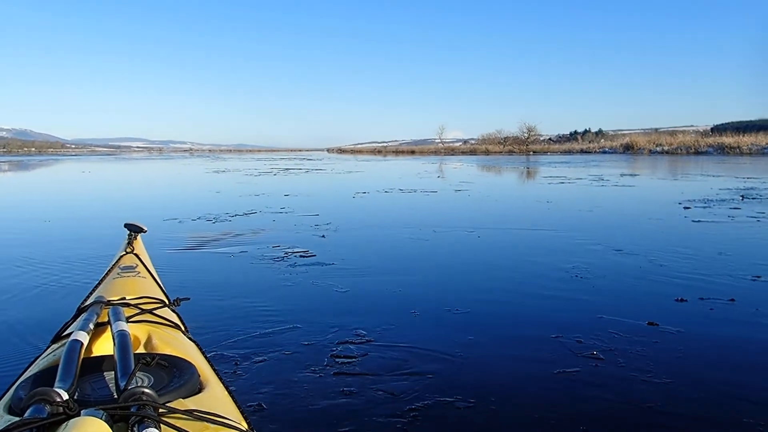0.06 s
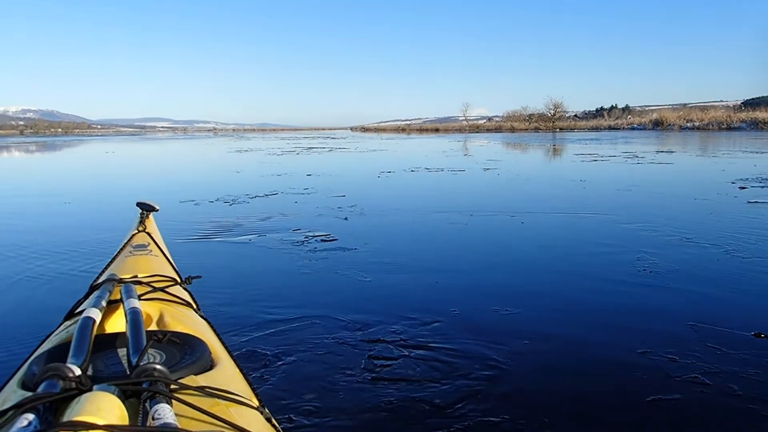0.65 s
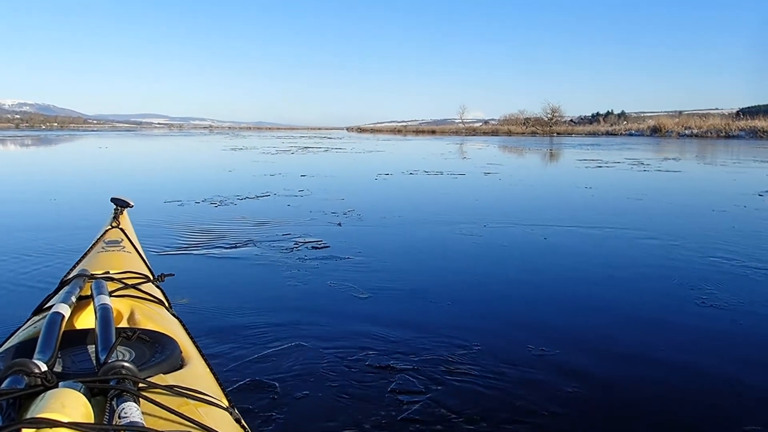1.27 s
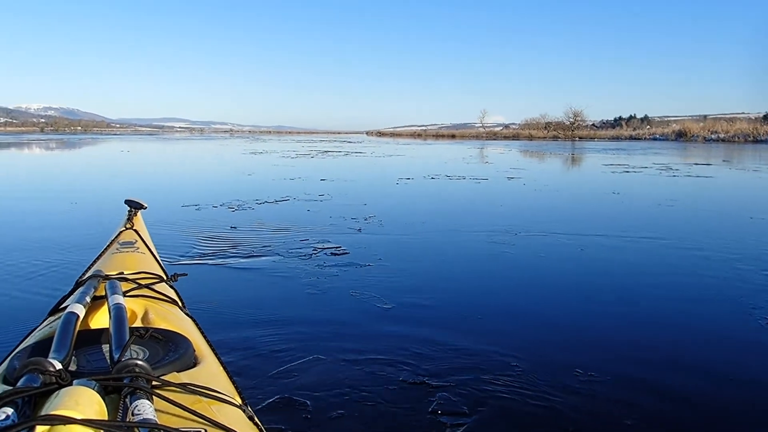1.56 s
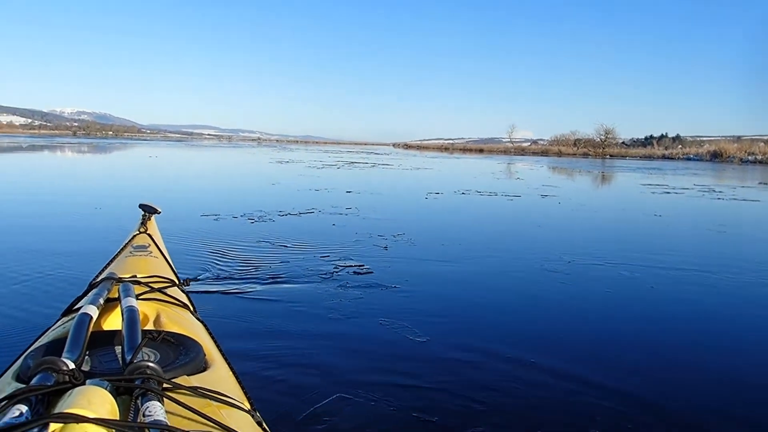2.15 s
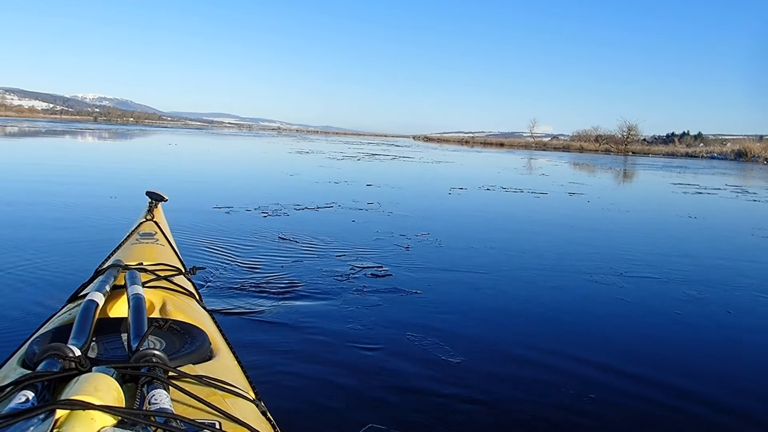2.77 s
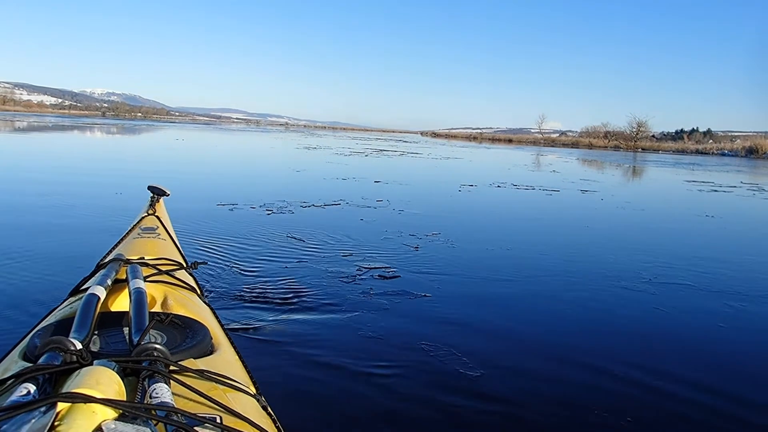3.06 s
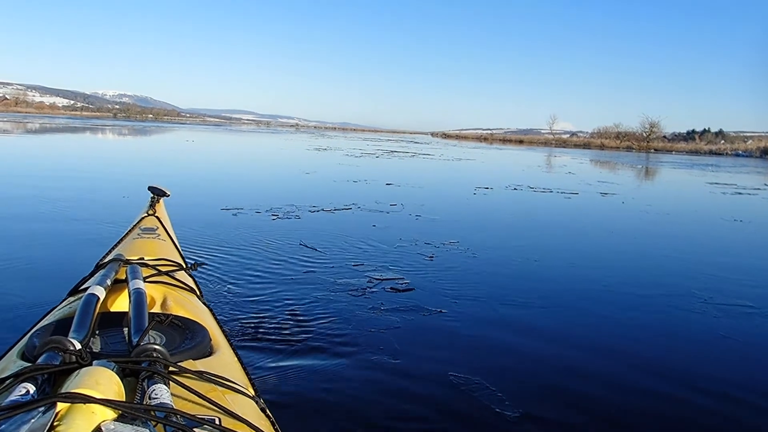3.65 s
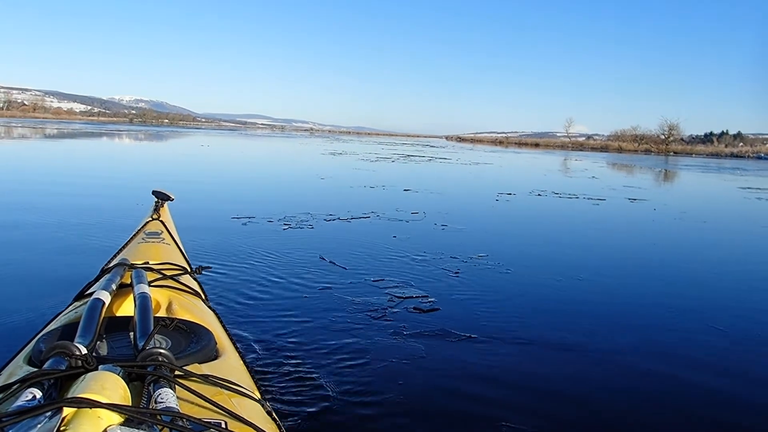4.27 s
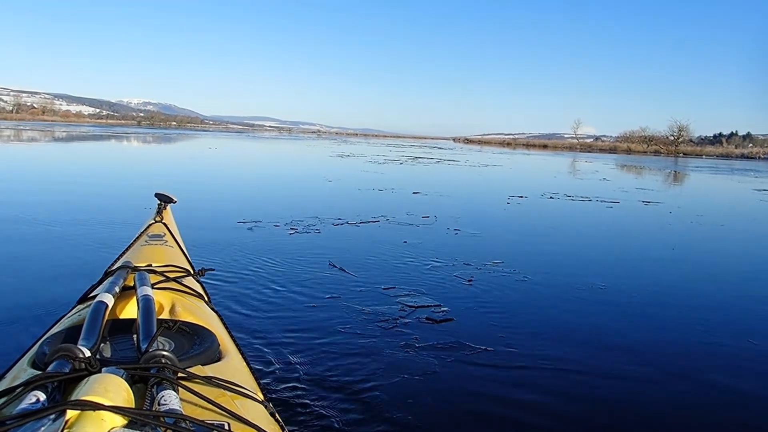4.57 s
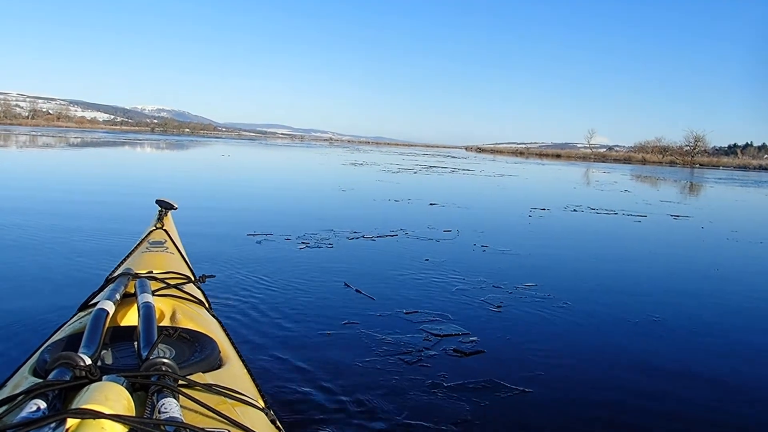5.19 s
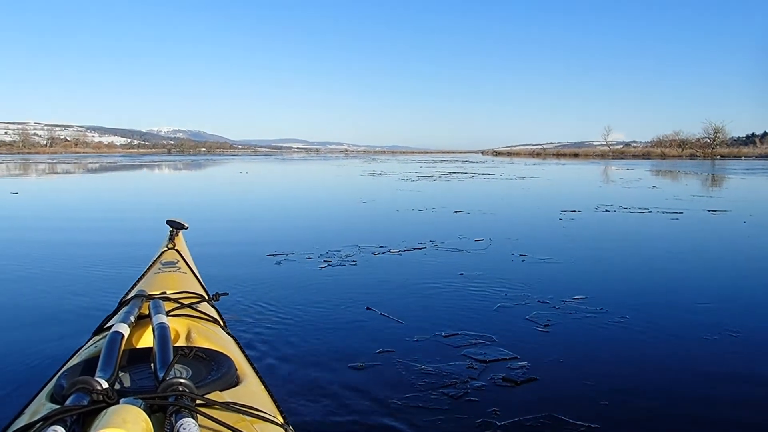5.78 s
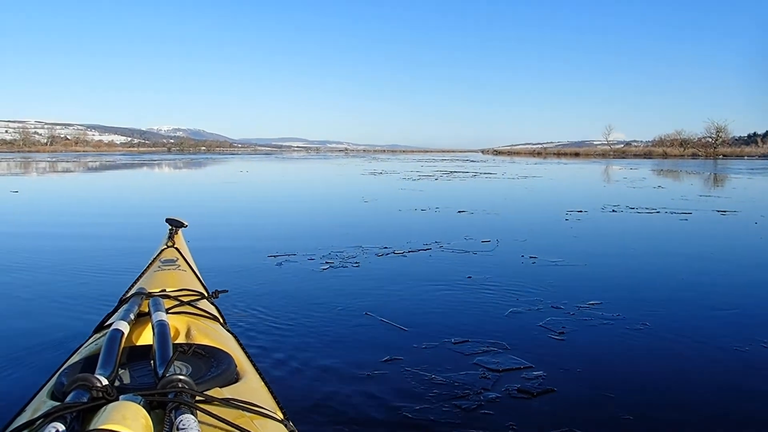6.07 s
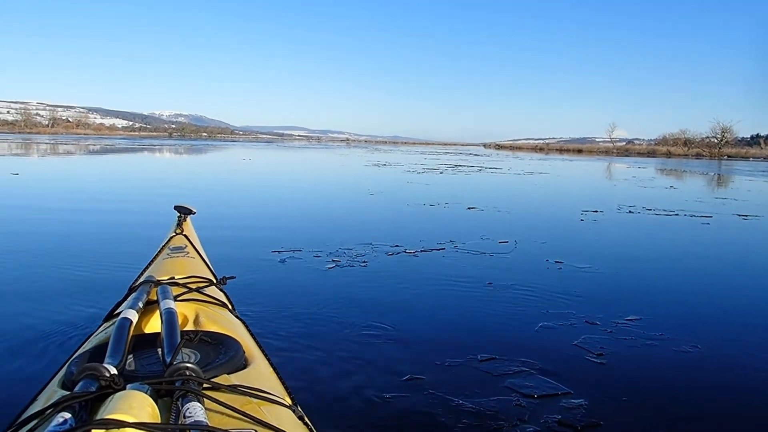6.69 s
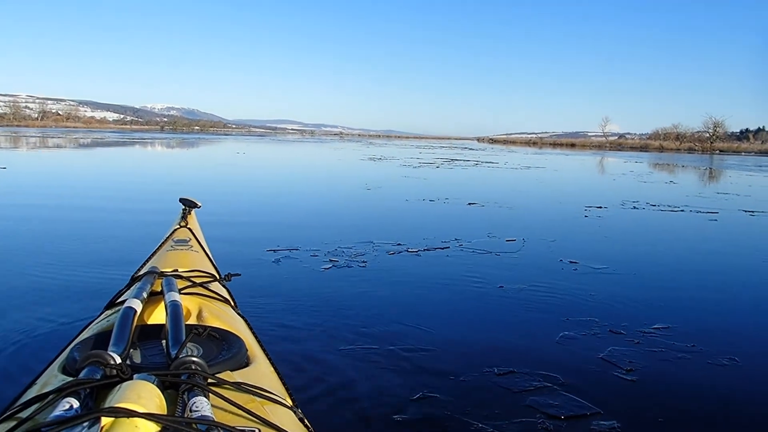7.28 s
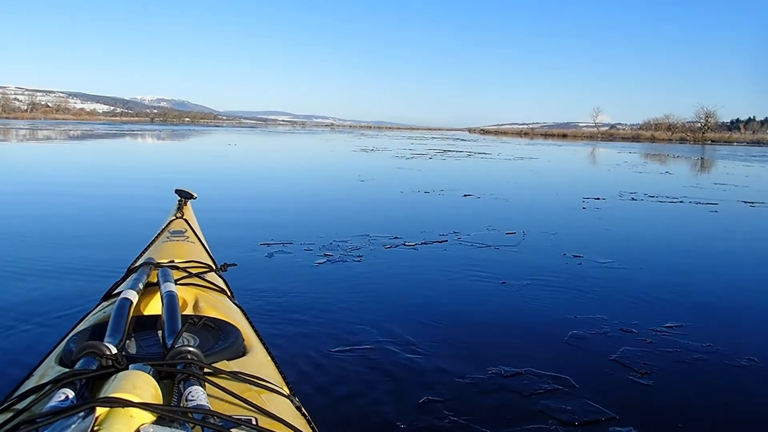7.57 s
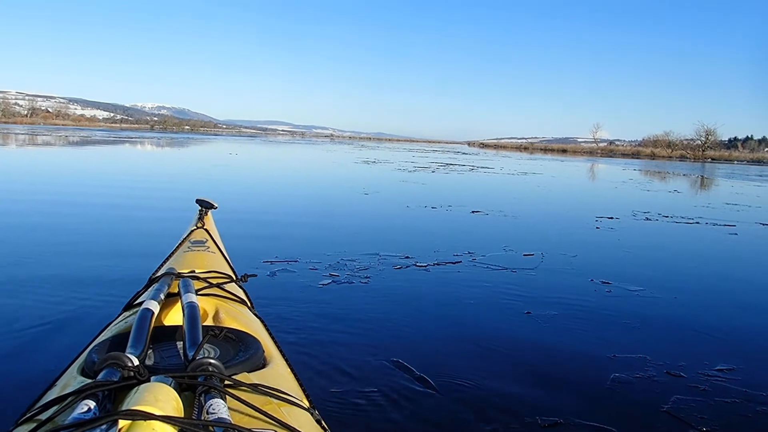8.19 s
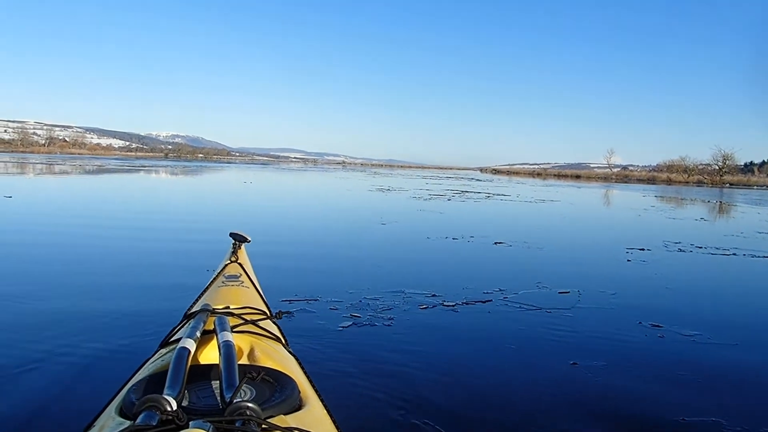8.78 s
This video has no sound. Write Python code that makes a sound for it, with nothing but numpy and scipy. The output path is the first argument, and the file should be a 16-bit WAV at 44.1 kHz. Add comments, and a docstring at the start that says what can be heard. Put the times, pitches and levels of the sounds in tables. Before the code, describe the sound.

Thin ice crackles and knocks against a kayak's hollow hull, thickening into a loud grind that gives way to soft water and drips.

```python
"""On a still river, a kayak noses through thin ice, heard from its own deck.
Each crack is a swarm of tiny fractures that fizzes (high) in the ice and knocks (middle) and booms
(low) in the hollow hull. Loose plates clack and thud against the boat. The crunching thickens into
a steady grinding, then the boat slides out into open water, where a few drops fall."""
import sys
import numpy as np
from scipy import signal
from scipy.fft import rfft, irfft
from scipy.io import wavfile
from scipy.ndimage import uniform_filter1d

SR = 44100
rng = np.random.default_rng(int(sys.argv[2]) if len(sys.argv) > 2 else 0)


def bounce(signal):
    """Save signal as a 16-bit WAV file at the path given by the first command-line argument."""
    frames = np.transpose(np.atleast_2d(signal))
    limited = np.clip(frames, -1, 1)
    pcm = np.round(limited * 32767).astype(np.int16)
    wavfile.write(sys.argv[1], SR, pcm)


N = 398663
TIME = np.arange(N) / SR
BOOM_TOP_HZ, KNOCK_TOP_HZ, FIZZ_FROM_HZ = 573, 2700, 3160
GRIND_START_S, GRIND_ATTACK_S, STALL_S = 5.735, 0.0015, 0.041


def from_db(db):
    """Turns decibels into a number to multiply by."""
    return 10 ** (np.asarray(db) / 20)


def rms_one(x):
    """Scales a sound so that its average power is 1."""
    return x / np.sqrt(np.mean(x ** 2) + 1e-20)


def unit_energy(x):
    """Scales a sound so that its squares add up to 1."""
    return x / np.sqrt(np.sum(x ** 2) + 1e-20)


def decay(t, t60):
    """Fades by 60 dB in t60 seconds, the fade time."""
    return np.exp(-np.log(1000) * t / t60)


def ramp(start_s, length_s):
    """Rises from 0 to 1."""
    return np.clip((TIME - start_s) / length_s, 0, 1)


def drift(rate):
    """A random curve that takes a new turn rate times a second."""
    knots = rng.standard_normal(8192)
    return np.interp(TIME * rate, np.arange(len(knots)), knots)


def add(track, s, sound):
    """Mixes a sound into a track at s seconds."""
    start = max(round(s * SR), 0)
    part = track[..., start:start + sound.shape[-1]]
    part += sound[..., :part.shape[-1]]


def butter(x, hz, kind, order=4):
    """Keeps the lows, the highs or a band of a sound."""
    sections = signal.butter(order, np.clip(hz, 10, .45 * SR), kind, fs=SR, output="sos")
    return signal.sosfilt(sections, x)


def colour(x, points, size=8192):
    """Shapes the tone along a curve of (Hz, dB) points."""
    hz, db = np.transpose(points)
    bins_hz = np.arange(size // 2 + 1) * SR / size
    log_gain = np.log(from_db(np.interp(np.log(bins_hz + 1), np.log(hz + 1), db)))
    cepstrum = irfft(log_gain)[:size // 2]
    cepstrum[1:] *= 2   # the filter rings only after a click, never before
    response = irfft(np.exp(rfft(cepstrum, size)))[:size // 2]
    shaped = signal.oaconvolve(np.atleast_2d(x), response[None], axes=1)
    return shaped[:, :x.shape[-1]].reshape(x.shape)


def river(level_db, ripple_db):
    """Water washes softly along the hull, with a wide, steady hiss on top."""
    # Each row: frequency in Hz, gain in dB.
    tone = [(30, -13), (95, -1), (270, 3), (384, -1.5), (584, -1), (670, -9), (800, -1), (1100, -3.5),
            (2000, -14.5), (2500, -28.5), (3600, -28.5), (5400, -14), (7700, -17), (9100, -11.5),
            (10400, -27), (16000, -28)]
    # Each row: frequency in Hz, stereo width in dB.
    width = [(60, -4), (240, -13), (950, -16), (3770, -13.5), (15000, 6)]
    # The water's swell. Each row: time in seconds, level change in dB.
    wash = [(0, -3), (0.8, -3.5), (1.1, -1), (2.2, 0.5), (2.9, -3.5), (7.2, -1), (8.65, -0.5), (8.8, 2),
            (8.92, -2)]
    mid, side = rng.standard_normal((2, N))
    lapping = butter(mid, KNOCK_TOP_HZ, "low", order=1) * (from_db(ripple_db * drift(25)) - 1)
    pair = mid + lapping + colour(side, width) * [[1], [-1]]
    return from_db(level_db + np.interp(TIME, *np.transpose(wash))) * rms_one(colour(pair, tone))


def fractures(per_s, spread_db, size):
    """Tiny breaks in the ice: random clicks, many small and a few large."""
    born = rng.random(size) < per_s / SR
    signs = rng.choice([-1, 1], size)
    return born * signs * from_db(spread_db * np.minimum(rng.exponential(1, size), 4))


def registers_db(s, level_db, bright_db):
    """Fizz, knock and boom levels of ice breaking at s seconds."""
    # How much the hull booms. Each row: time in seconds, boom over knock in dB.
    boominess = [(0, 2.5), (2.5, 2), (3.3, 5), (5.9, 2), (6.3, -2.5), (6.55, -6.5), (6.9, -6), (7.3, -3)]
    return np.array([level_db + bright_db, level_db, level_db + np.interp(s, *np.transpose(boominess))])


def crumbling(level_db, bright_db, per_s, spread_db, clump_db, clumps_per_s, trim_db):
    """Ice sticks and slips, breaking in clumps; gives the fizz, knock and boom forces."""
    # The ice holds for a moment. Each row: time in seconds, dip of the fizz in dB.
    stalls = [(.11, -26), (.5, -33), (.73, -29), (3.69, -13), (4.065, -12), (4.71, -6.5), (5.71, -11.5),
              (5.899, -7.5), (6.1, -5.5), (6.51, -4), (6.78, -4.5), (6.979, -12)]
    clicks = fractures(per_s, spread_db, N) * from_db(clump_db * drift(clumps_per_s))
    power = np.abs(uniform_filter1d(clicks ** 2, round(.07 * SR)))
    clicks = clicks / np.sqrt(power + 1e-9)
    stalled_db = sum(db * np.exp(-((TIME - s) / STALL_S) ** 2) for s, db in stalls)
    hush_db = np.outer([1, 0.68, 0.8], stalled_db)   # knock and boom dip less
    return clicks * from_db(registers_db(TIME, level_db, bright_db) + hush_db + np.array(trim_db)[:, None])


def crunching():
    """Small ice crumbles at the bow until the big sheet takes over."""
    # Each row: time in seconds, relative level in dB, fizz over knock in dB.
    crunch = [(0.0, -60, -17), (0.25, -40, -9), (0.8, -46, -11), (1.099, -38, -3), (1.6, -40, -9.5),
              (1.95, -51.5, -1), (2.3, -54, 6.5), (2.55, -39.5, -9.5), (2.95, -53, -10), (3.3, -31.5, -7.5),
              (3.65, -33.5, -17.5), (4.2, -29, -12), (4.55, -33.5, -10.5), (5.0, -27.5, -8.5),
              (5.3, -31, -9), (5.73, -34, -13)]
    # Thicker ice is lumpier. Each row: time in seconds, spread of the clumps in dB.
    lumpiness = [(1.8, 4.5), (3.3, 6)]
    s, level_db, bright_db = np.transpose(crunch)
    clump_db = np.interp(TIME, *np.transpose(lumpiness))
    forces = crumbling(np.interp(TIME, s, level_db), np.interp(TIME, s, bright_db), per_s=2800,
                       spread_db=2.5, clump_db=clump_db, clumps_per_s=80, trim_db=[-.3, -.3, -.3])
    return forces * (1 - ramp(GRIND_START_S, GRIND_ATTACK_S))


def stray_bits(per_s, level_db):
    """Drifting crumbs of ice tick on the hull, too light to make it boom."""
    return np.outer([1, 1, 0], from_db(level_db) * fractures(per_s, 1, N))


def cracks(trim_db, click_share, swell_t60, boom_linger_s):
    """Each crack swells in quickly to a sharp click, then its crackle dies as the hull booms on."""
    # Each row: start in seconds, relative level in dB, brightness in dB, fade time in seconds.
    breaks = [(0.02, -3.5, -11.5, 0.22), (0.154, -3, -5, 0.35), (0.354, -2, -7, 0.21),
              (0.539, -2.5, -7.5, 0.12), (0.59, -6, -2.5, 0.28), (0.644, -6.5, -5, 0.034),
              (0.783, -13, -7.5, 0.045), (0.874, -7, -1.5, 0.075), (0.933, -4, -5.5, 0.04),
              (0.955, -14.5, 3.5, 0.022), (1.012, -5.5, -5, 0.037), (1.302, -18, 8, 0.021),
              (2.041, -8, -7, 0.04), (2.087, -1.5, -10.5, 0.068), (2.152, -14.5, 0.5, 0.0086),
              (2.333, -2.5, -5, 0.047), (2.424, 3.5, -1, 0.085), (2.699, -5, -5, 0.02),
              (2.753, -7, -5.5, 0.013), (2.873, -3, -4, 0.12), (2.972, -4.5, -8, 0.032),
              (3.019, 1.5, -5.5, 0.084), (3.052, 2.5, -4.5, 0.09), (3.114, -2, -8, 0.045),
              (3.14, -8, -3, 0.036), (3.251, -6, -3, 0.055), (3.338, 2, -10.5, 0.1),
              (3.392, -5, 1.5, 0.029), (3.479, -1, -2, 0.042), (3.532, 3, -6.5, 0.036),
              (3.579, -0.5, -3, 0.021), (3.631, -8, -2.5, 0.011), (3.653, -1, -3.5, 0.039),
              (3.722, -4, -1, 0.13), (3.82, -4, -1.5, 0.056), (3.878, -6.5, 0.5, 0.046),
              (3.958, 1.5, -9, 0.068), (4.089, 2, -11.5, 0.12), (4.134, 0.5, -4, 0.23), (4.173, 1, -6, 0.2),
              (4.271, 2, -7.5, 0.14), (4.295, -0.5, -11, 0.033), (4.35, -5, -1, 0.02),
              (4.437, -0.5, -8.5, 0.034), (4.522, 2, -8, 0.025), (4.627, -5, 0.5, 0.092),
              (4.772, -4, -5.5, 0.019), (4.8, -5, -3, 0.015), (4.881, -4, -7, 0.04), (4.935, -6, 4, 0.17),
              (4.966, -2, 0.5, 0.06), (5.016, -5, 2.5, 0.03), (5.061, -2.5, -0.5, 0.014),
              (5.096, 5.5, -1, 0.2), (5.195, 2.5, -1.5, 0.05), (5.324, -2, -17, 0.03),
              (5.368, -4.5, 4.5, 0.09), (5.429, -1.5, -1, 0.051), (5.522, -1, -6, 0.037),
              (5.557, 0.5, -12.5, 0.019), (5.66, -2.5, -12.5, 0.11), (5.736, -5, 5, 0.09),
              (6.46, 0.5, 5, 0.1), (6.96, 2.5, -3, 0.009), (6.995, -3.5, -4, 0.028), (7.012, -3, -1, 0.016),
              (7.033, 0.5, 2, 0.074), (7.09, -3, 0.5, 0.028), (7.241, -18, -4, 0.042)]
    forces, lead = np.zeros((3, N)), 512
    t = TIME[:20 * lead] - lead / SR
    for s, db, bright_db, t60 in breaks:
        clicks = fractures(per_s=3000, spread_db=4.5, size=len(t))
        gains = from_db(registers_db(s, db, bright_db) + trim_db)
        for force, gain, dying_t60 in zip(forces, gains, (t60, t60, t60 + boom_linger_s)):
            swarm = unit_energy(clicks * decay(np.abs(t), np.where(t < 0, swell_t60, dying_t60)))
            swarm[lead] += click_share
            add(force, s + .001 + t[0], gain * unit_energy(swarm))
    return forces


def plates(force, low_hz, high_hz, ring_t60, direct_db, hold_s, count, spread_hz=None):
    """Plates of ice take turns to ring, each at its own pitch; spread_hz scatters small shards."""
    # A shard's size sets its tinkle. Each row: time in seconds, typical pitch in Hz.
    shard_pitch = [(1.2, 6970), (2.4, 5560), (3.4, 5830), (3.58, 7220), (4.3, 5420), (4.97, 6300),
                   (5.08, 8500), (5.2, 5500), (5.37, 7870), (5.8, 7130), (6.0, 5440), (6.72, 6110),
                   (6.85, 5390)]
    at = np.flatnonzero(force)
    turn = (at / SR / hold_s).astype(int)
    chosen = rng.integers(0, count, N)[turn]
    if spread_hz is not None:
        pitch = np.interp(at / SR, *np.transpose(shard_pitch)) + spread_hz * rng.standard_normal(N)[turn]
        chosen = np.round((pitch - low_hz) / (high_hz - low_hz) * (count - 1)) % count
    r = decay(1 / SR, ring_t60)   # share of the ring left after one sample
    gain = np.sqrt((1 - r) * (high_hz - low_hz) / SR)
    out = from_db(direct_db) * force
    for k, hz in enumerate(np.linspace(low_hz, high_hz, count)):
        clicks = np.full(N, 1e-18)
        clicks[at[chosen == k]] = force[at[chosen == k]]
        out += signal.lfilter([gain, 0, -gain], [1, -2 * r * np.cos(2 * np.pi * hz / SR), r * r], clicks)
    return out / np.sqrt(1 + from_db(direct_db) ** 2)


def loose_ice(fizz, knock, boom):
    """Small shards tinkle briefly, larger floes clack, whole sheets boom."""
    return [plates(fizz, 3740, 10760, ring_t60=0.0031, direct_db=-3.5, hold_s=0.0018, count=23,
                   spread_hz=1800),
            plates(knock, 501, 2292, ring_t60=0.077, direct_db=1.5, hold_s=.007, count=28),
            plates(boom, 62.4, 481.6, ring_t60=0.092, direct_db=-2, hold_s=.002, count=12)]


def hull_response(tone, modes, modes_db, scatter_db, scatter_t60):
    """The boat answers one fracture with a click, ringing notes (modes) and a bright tail."""
    # Each row: frequency in Hz, stereo width in dB.
    width = [(60, -28), (200, -10), (600, -18), (1500, -36), (3000, -18), (5000, 1.5), (9000, 8),
             (13000, 10.5)]
    t = TIME[:8192]
    tail, side = (unit_energy(noise * decay(t, scatter_t60)) for noise in rng.standard_normal((2, len(t))))
    mid = (t == 0) + from_db(scatter_db) * butter(tail, 2760, "high", order=2)
    for hz, db, t60 in modes:
        dying = decay(t, t60)
        mid += from_db(db + modes_db) * 2 * np.cos(2 * np.pi * hz * t) * dying / dying.sum()
    return colour(np.array([mid, colour(side, width)]), tone)


def through_hull(forces, response, width_db, pans_db):
    """Fizz, knock and boom pass through the boat; slow bending waves bring the low ones later."""
    # Each row: band edges in Hz, filter kind, delay in seconds.
    registers = [(FIZZ_FROM_HZ, "high", 0), ([BOOM_TOP_HZ, KNOCK_TOP_HZ], "band", .001),
                 (BOOM_TOP_HZ, "low", .004)]
    out, apart = np.zeros((2, N)), np.array([[1], [-1]])
    for force, pan_db, (hz, kind, lag_s) in zip(forces, pans_db, registers):
        path = butter(response, hz, kind)
        wandering = np.array([force, force * drift(250)])   # each fracture has its own direction
        mid, side = signal.oaconvolve(wandering, path / np.sqrt(np.sum(path[0] ** 2)), axes=1)
        add(out, lag_s, (mid + from_db(width_db) * side * apart) * from_db(pan_db / 2 * apart))
    return out


def bumps(t60, top_hz):
    """Loose plates clack against the bow; the wet contact softens their highest notes."""
    # Each row: start in seconds, relative level in dB, lowest note in Hz.
    hits = [(0.028, -32, 1063), (0.538, -28.5, 940), (2.088, -30, 870), (2.336, -24.5, 383),
            (2.433, -16, 375), (6.328, -16, 1067), (6.563, -16.5, 1080), (6.653, -12.5, 1027),
            (6.927, -16, 1090), (7.036, -15, 952)]
    # A plate's notes. Each row: multiple of the lowest note, relative level in dB.
    notes = [(1, -1.5), (1.27, -7.5), (1.59, -8), (2, -7), (2.33, -12)]
    out, t = np.zeros(N), TIME[:SR // 4]
    for s, db, hz in hits:
        for k, (multiple, note_db) in enumerate(notes):
            ring = np.sin(2 * np.pi * hz * multiple * t) * decay(t, t60)
            add(out, s, (-1) ** k * from_db(db + note_db) * ring)
    return butter(out, top_hz, "low", order=3)


def snaps(level_db, ring_t60, spray_db):
    """Sharp snaps and ticks close by: a very short ring and a bright spray."""
    # Each row: start in seconds, relative level in dB, pitch in Hz, low cut in Hz.
    ticks = [(1.0145, -15.5, 6800, 4060), (1.7863, -13, 4800, 1400), (3.535, -19, 6600, 4000),
             (5.2128, -7.5, 6960, 4800), (5.8202, -4.5, 6900, 4800), (5.931, -11.5, 7400, 4800)]
    out, t = np.zeros((2, N)), TIME[:1024]
    for s, db, hz, low_hz in ticks:
        burst = rng.standard_normal((2, len(t))) * decay(t, 0.0068)
        spray = colour(burst, [(1500, -59), (5000, -4), (9000, 24), (14000, -18)])
        spray *= from_db([[2.5], [-2.5]])   # louder on the left
        snap = np.sin(2 * np.pi * hz * t) * decay(t, ring_t60) + from_db(spray_db) * spray
        add(out, s, from_db(db + level_db) * butter(snap, low_hz, "high", order=3))
    return out


def thuds(level_db, t60, attack_t60, rise_per_s):
    """A soft blow on the hull rings a floe or a pocket of water, whose pitch lifts as it closes."""
    # Each row: start in seconds, relative level in dB, pitch in Hz.
    blows = [(1.512, -24.5, 181), (1.72, -23, 129), (3.334, -11.5, 203), (3.341, -15, 137),
             (3.403, -12, 182), (3.59, -15, 195), (3.783, -17, 180), (3.952, -11.5, 119), (4.011, -18, 188),
             (4.13, -14, 321), (4.17, -12.5, 331), (4.29, -17, 380), (4.44, -13, 201), (4.523, -7, 191),
             (4.804, -9, 190), (4.85, -8, 177), (4.883, -7, 173), (4.989, -6, 190), (5.068, -14, 168),
             (5.224, -11, 175), (5.433, -14, 483), (5.552, -14, 273), (5.824, -19, 333),
             (5.872, -13.5, 313), (5.878, -9, 186), (5.944, -10, 135), (5.955, -15.5, 302),
             (6.339, -12.5, 193)]
    out, t = np.zeros(N), TIME[:SR // 4]
    for s, db, hz in blows:
        pocket = np.sin(2 * np.pi * hz * t * (1 + rise_per_s * (t - t60 / 2)))
        add(out, s, from_db(db + level_db) * pocket * decay(t, t60) * (1 - decay(t, attack_t60)))
    return out


def heaves(low_hz, high_hz, t60):
    """The hull flexes with a deep, soft thump as it rides over a sheet."""
    # Each row: start in seconds, relative level in dB.
    flexes = [(3.041, -35), (3.558, -29.5), (5.22, -28.5), (5.519, -29), (5.818, -31)]
    out, t = np.zeros(N), TIME[:SR // 2]
    for s, db in flexes:
        thump = rms_one(butter(rng.standard_normal(len(t)), [low_hz, high_hz], "band", order=3))
        add(out, s, from_db(db) * thump * decay(t, t60))
    return butter(out, 54, "high")


def grinding(stop_s, release_s):
    """A whole sheet catches and shears along the boat, then lets go, and the pieces settle."""
    held_s = np.clip(TIME, GRIND_START_S, stop_s) - GRIND_START_S
    after_s = np.maximum(TIME - stop_s - release_s, 0)
    level_db = -28 + 1.5 * held_s - 1.5 * ramp(stop_s, release_s) - 50.5 * after_s   # swell, dip, fade
    bright_db = -0.5 + decay(held_s, t60=0.37) - 19 * after_s   # bright first bite, dull ending
    forces = crumbling(level_db, bright_db, per_s=11000, spread_db=2.0, clump_db=3.5,
                       clumps_per_s=260, trim_db=[1.2, .5, .3])
    return forces * ramp(GRIND_START_S - GRIND_ATTACK_S, GRIND_ATTACK_S)


def sheet_edge(fizz, knock, boom):
    """Along the shearing edge, glassy shards jingle and plates take turns to ring."""
    return [plates(fizz, 3530, 10500, ring_t60=0.026, direct_db=-0.5, hold_s=0.0008, count=71,
                   spread_hz=1600),
            plates(knock, 696, 2033, ring_t60=0.077, direct_db=1.5, hold_s=.001, count=24), boom]


def drops(ring_t60, rise_per_s, splash_db):
    """Each drop makes a small splash and traps a bubble whose pitch rises a little as it dies."""
    # Each row: start in seconds, starting pitch in Hz, relative level in dB.
    drips = [(7.243, 920, -29.5), (7.46, 5640, -42), (7.588, 1400, -36), (7.623, 3430, -49),
             (8.015, 804, -26), (8.016, 5370, -35.5), (8.017, 580, -30), (8.33, 2700, -50),
             (8.867, 1070, -34.5), (9.03, 1360, -35)]
    out, t = np.zeros(N), TIME[:4096]
    envelope = decay(t, ring_t60) * (1 - decay(t, 0.0022))
    for s, hz, db in drips:
        bubble = np.sin(2 * np.pi * hz * t * (1 + rise_per_s * t))
        splash = rms_one(butter(rng.standard_normal(len(t)), [hz / 1.23, hz * 1.18], "band", order=2))
        add(out, s, from_db(db) * (bubble + from_db(splash_db) * splash) * envelope)
    return out


def scene():
    """Cracks, crunch and grinding sound through the hull, over the river."""
    # Notes of the hull and the ice sheet. Each row: pitch in Hz, relative level in dB, fade in seconds.
    hull_modes = [(78, -4, 0.089), (186, -1, 0.19), (471.4, 4.5, 0.051), (827, 2.5, 0.024),
                  (1120, -5, 0.18), (1483, -11, 0.12), (6250, -11, 0.024)]
    sheet_modes = [(580, -6, 0.066), (762, 5.5, 0.083), (1100, 3, 0.084), (1493, 3.5, 0.048),
                   (1860, -9, 0.045), (4730, -5, 0.0028), (5700, 2, 0.015), (6900, -9, 0.016)]
    # Tone of the struck and the rubbed hull. Each row: frequency in Hz, gain in dB.
    struck_tone = [(24, -66), (66, -10), (189, 1.5), (245, -1), (449, -6), (684, -23.5), (866, -23),
                   (1430, -21), (2120, -31.5), (2540, -44), (5590, -31), (8740, -34.5), (10500, -45),
                   (16000, -57.5)]
    rubbed_tone = [(24, -57), (64, -3.5), (200, 1), (584, -1.5), (666, -13), (920, -3.5), (1040, 0.5),
                   (1220, -1.5), (2010, -8), (2200, -10.5), (2480, -19), (3300, -18.5), (4300, -15.5),
                   (5740, -11.5), (9460, -15.5), (10400, -23.5), (16000, -35)]
    breaking = cracks(trim_db=[1.4, 1.9, 0.5], click_share=0.16, swell_t60=0.014, boom_linger_s=0.087)
    on_sheet = TIME > GRIND_START_S - STALL_S
    struck = hull_response(struck_tone, hull_modes, modes_db=0, scatter_db=-9, scatter_t60=.014)
    # steady rubbing keeps the hull singing, and the sheet with it
    rubbed = hull_response(rubbed_tone, hull_modes + sheet_modes, modes_db=-0.5, scatter_db=-13,
                           scatter_t60=0.031)
    loose = loose_ice(*(breaking * ~on_sheet + crunching() + stray_bits(per_s=9.1, level_db=-36)))
    ice = through_hull(loose, struck, width_db=-8, pans_db=[.3, -.4, -.5])
    edge = sheet_edge(*(breaking * on_sheet + grinding(stop_s=6.815, release_s=0.077)))
    sheet = through_hull(edge, rubbed, width_db=-5, pans_db=[2.8, -.2, -.4])
    water = river(level_db=-41.94, ripple_db=2.5) + drops(ring_t60=0.035, rise_per_s=1.8, splash_db=-0.5)
    clacking = bumps(t60=0.099, top_hz=1400)
    flexing = heaves(low_hz=50, high_hz=95, t60=1.0)
    thudding = thuds(level_db=-4.5, t60=0.13, attack_t60=0.017, rise_per_s=0.51)
    snapping = snaps(level_db=7.5, ring_t60=0.0025, spray_db=-20.5)
    return ice + sheet + clacking + flexing + thudding + snapping + water


def record(dry):
    """Rounds off the loudest peaks and cuts the highest treble."""
    rounded = dry / (1 + (dry / .8) ** 6) ** (1 / 6)
    return signal.sosfilt(signal.cheby2(14, 60, 16667, fs=SR, output="sos"), rounded)


dry = scene()
out = record(dry)
bounce(out)
```